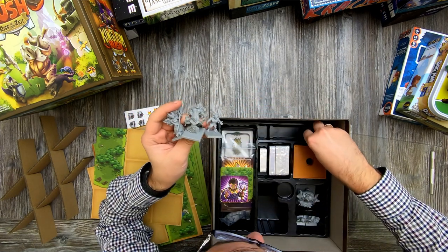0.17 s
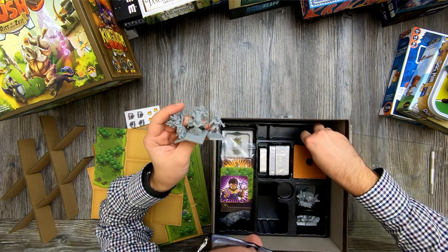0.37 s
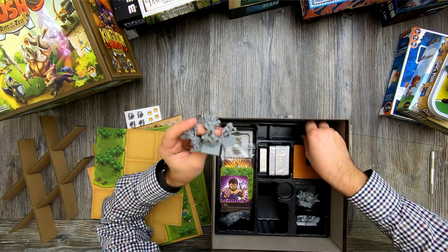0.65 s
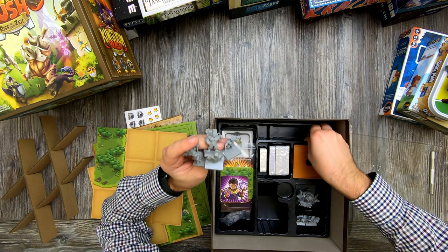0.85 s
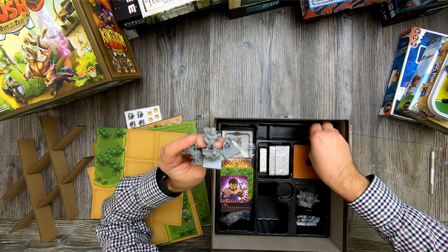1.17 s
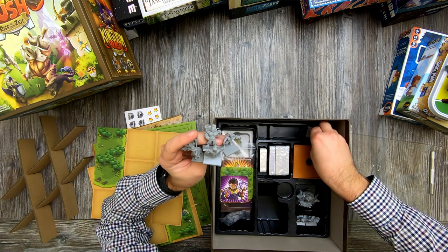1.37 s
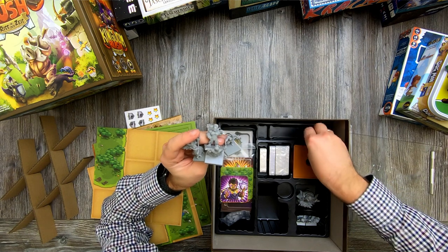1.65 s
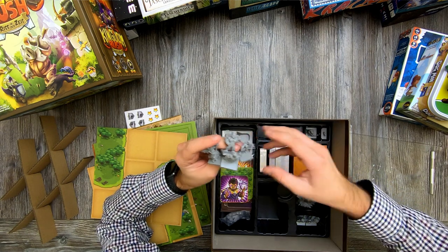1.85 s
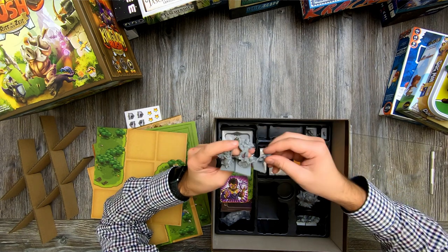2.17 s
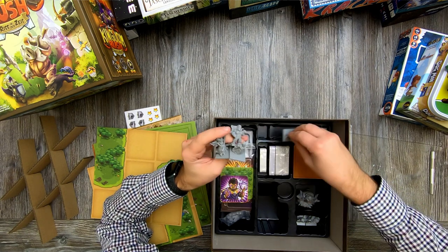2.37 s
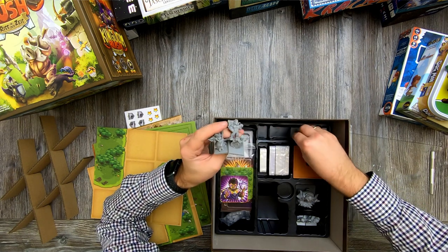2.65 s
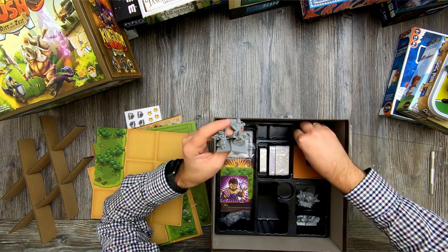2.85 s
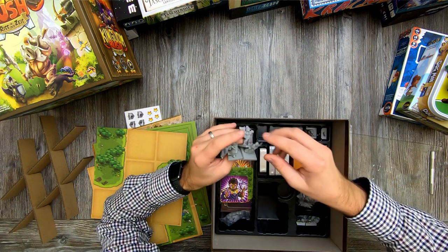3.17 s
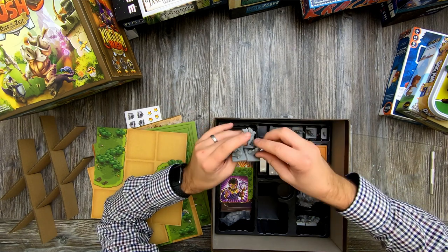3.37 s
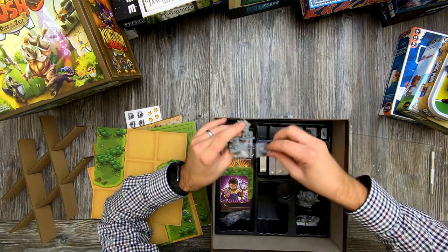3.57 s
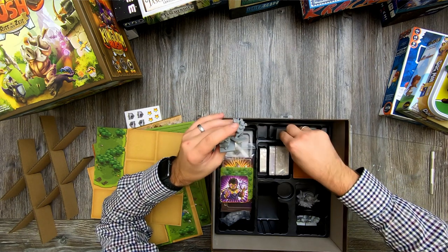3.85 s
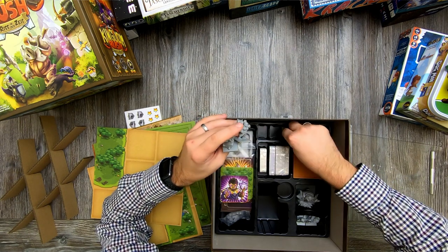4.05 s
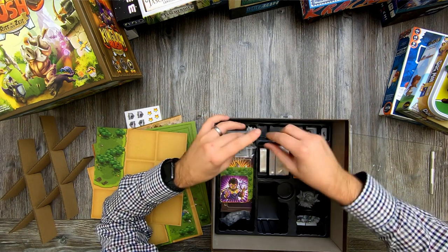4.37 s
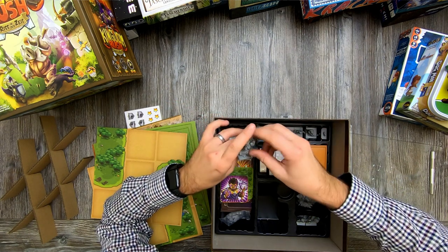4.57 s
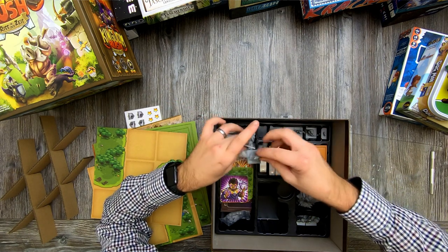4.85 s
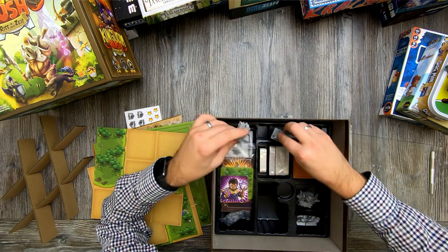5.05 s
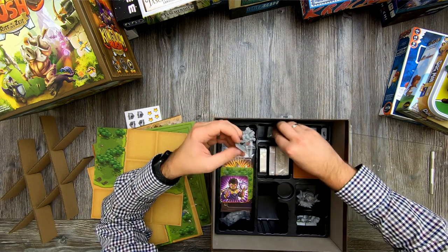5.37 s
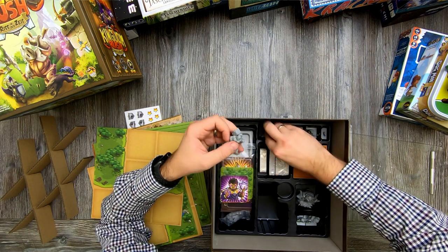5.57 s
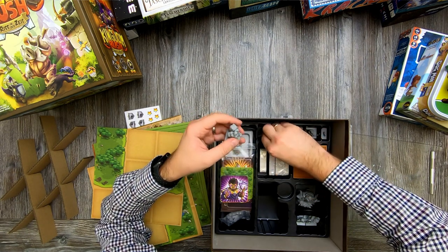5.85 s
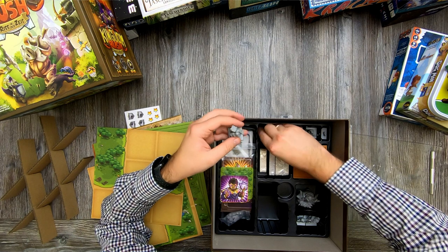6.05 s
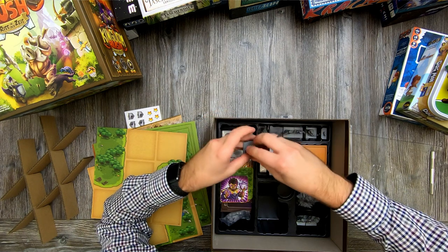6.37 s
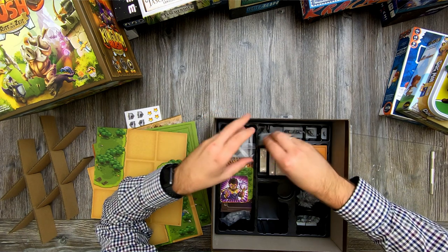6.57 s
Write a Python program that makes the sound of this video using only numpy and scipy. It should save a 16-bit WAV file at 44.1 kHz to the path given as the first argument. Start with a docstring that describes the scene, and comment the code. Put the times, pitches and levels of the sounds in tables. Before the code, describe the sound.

Dry, light plastic clatter in uneven bursts: hollow tray knocks with crisp clicking edges, brief scrapes and squeaks from fingers and figures, and a very faint high metallic jingle. Quiet gaps separate the clusters, and a last dense flurry brings delicate metal tinkling. Soft low room tone and short indoor echoes, heard from one microphone above the table.

```python
"""Small plastic figures are set down into the wells of a thin plastic tray inside a cardboard box, in a quiet room.
Each touch excites dying bands of noise and the modes of tray and figure; figures also click in the hand.
Metal rings tinkle as decaying modes and a thin jingle shakes faintly; rubbing is dense random slips, and random
pulses in narrow bands make short rubs, squeaks and thin metallic tones. Diffuse echoes follow the touches, clicks
and tinkles over room tone. One nearly mono microphone hangs above; only a faint hiss differs between its sides."""
import sys
import numpy as np
from scipy import signal
from scipy.fft import rfft, irfft
from scipy.io import wavfile

SR = 44100
rng = np.random.default_rng(int(sys.argv[2]) if len(sys.argv) > 2 else 0)


def wav_out(sig):
    """Save sig, one row per channel (or a flat mono array), as 16-bit PCM at SR to the path in sys.argv[1]."""
    wavfile.write(sys.argv[1], SR, np.round(np.clip(np.atleast_2d(sig).T, -1, 1) * 32767).astype(np.int16))


N = 295381


def from_db(db):
    """Logarithmic level: decibels to amplitude gain."""
    return 10 ** (np.asarray(db) / 20)


def rms_one(x):
    """Normalisation of mean power: scale to unit rms."""
    return x / np.sqrt(np.mean(x ** 2) + 1e-20)


def in_time(rows):
    """Linear interpolation: the columns of a curve table at every sample."""
    s, *columns = np.transpose(rows)
    return [np.interp(np.arange(N) / SR, s, column) for column in columns]


def shaped(x, spectrum):
    """Spectral filtering: colour a steady sound by (frequency_hz, gain_db) points over log frequency."""
    hz, db = np.transpose(spectrum)
    grid_hz = np.maximum(np.arange(N // 2 + 1) * SR / N, 1)
    gain_db = np.interp(np.log(grid_hz), np.log(hz), db)
    return irfft(rfft(x) * from_db(gain_db), N)


def band(x, low_hz, high_hz):
    """Band-pass filtering: only the components between two frequencies pass."""
    edges_hz = [low_hz, min(high_hz, .45 * SR)]
    return signal.sosfilt(signal.butter(3, edges_hz, "band", fs=SR, output="sos"), x)


def resonance(x, hz, width_hz):
    """Damped resonance: a pole pair with gain 1 on top, its radius set by the bandwidth."""
    r = np.exp(-np.pi * width_hz / SR)
    numerator = np.array([1, 0, -1]) * (1 - r * r) / 2
    return signal.lfilter(numerator, [1, -2 * r * np.cos(2 * np.pi * hz / SR), r * r], x)


def grains(per_s, spread_db):
    """Random impulse process: tiny contacts of uneven size and sign; rms 1."""
    sizes = from_db(spread_db * np.minimum(rng.exponential(1, N), 4))
    signed = sizes * rng.choice([-1, 1], N)
    return rms_one(signed * (rng.random(N) < per_s / SR))


def near_note(peak_db, note_hz, modes, db_per_octave):
    """Modal excitation: where a blow lands decides its note; modes farther from it are weaker."""
    octaves_off = np.abs(np.log2(np.array(modes)[:, 0] / note_hz[:, None]))
    return peak_db[:, None] - db_per_octave * octaves_off


def strike(times, peaks_db, modes, spread_db):
    """Impulse response of modes: clicks ring each one; peaks_db is blows x modes, varied by chance."""
    at = np.round(np.asarray(times) * SR).astype(int)
    out = np.zeros(N)
    strengths = from_db(peaks_db + spread_db * rng.standard_normal(peaks_db.shape))
    for k, (hz, gain_db, t60) in enumerate(modes):
        clicks = np.full(N, 1e-18)
        clicks[at] = strengths[:, k] * from_db(gain_db) * (-1) ** k   # neighbouring modes alternate in sign
        r = from_db(-60 / (t60 * SR))
        w = 2 * np.pi * hz / SR
        out += signal.lfilter([0, np.sin(w)], [1, -2 * r * np.cos(w), r * r], clicks)
    return out


# Figure touches tray: start_s, knock_db, hardness_db (extra treble), ring_down_s (t60 before each part's share),
# hollow_note_hz, wall_note_hz (favoured notes)
TOUCHES = [(0.001, -22, 0.5, 0.23, 483, 1140), (0.12, -29, 2, 0.29, 424, 1093),
           (0.231, -29, -0.5, 0.41, 355, 751), (.251, -24, 2, 0.24, 352, 1130),
           (.33, -28.5, -16, 0.14, 387, 813), (.389, -40, 15, 0.37, 396, 934),
           (.465, -20, -3, 0.38, 294, 885), (.492, -22, 0.5, .26, 393, 980),
           (0.513, -14.5, -8.5, 0.28, 560, 1060), (.527, -10, -9.5, 0.22, 365, 780),
           (0.636, -18, -1.5, 0.26, 340, 1200), (.736, -30, -6, 0.93, 400, 1450),
           (0.818, -35.5, 2.5, 0.58, 440, 1530), (1.011, -27, -9, 0.65, 402, 1130),
           (1.116, -19.5, 0.5, 0.43, 302, 1120), (1.15, -24, 6.5, .082, 570, 1220),
           (1.169, -22, 3.5, 0.074, 636, 1140), (1.249, -25, 5, 0.17, 320, 960),
           (1.329, -26.5, 0.5, 0.21, 407, 770), (1.376, -27.5, 3, 0.28, 370, 1650),
           (1.429, -32, 18, 0.4, 361, 1600), (1.462, -8.5, -8.5, 0.28, 350, 830),
           (1.502, -12.5, -2, 0.043, 402, 1140), (1.534, -19, -7.5, 0.14, 622, 760),
           (1.548, -20.5, -2.5, 0.25, 400, 1160), (2.5, -28.5, -6.5, 0.2, 524, 720),
           (2.56, -36.5, 6, 0.59, 367, 1090), (2.661, -20.5, -2, 0.16, 366, 910),
           (2.741, -21.5, 0.5, 0.098, 300, 1210), (2.766, -16.5, 8, 0.13, 352, 785),
           (2.785, -28, 15, 0.14, 490, 1210), (2.802, -23, -1, 0.15, 460, 1140),
           (2.882, -31.5, 4.5, 0.26, 292, 1130), (2.909, -32, 3, 0.13, 424, 1120),
           (3.802, -17, -5, 0.31, 418, 1560), (4.016, -40.5, 20, 0.22, 473, 1020),
           (4.047, -18.5, 1.5, 0.2, 334, 910), (4.063, -25.5, -11, .1, 330, 950),
           (4.134, -22.5, -5, 0.24, 690, 1300), (4.222, -14.5, -8, 0.22, 386, 990),
           (4.237, -26.5, -13, 0.29, 438, 896), (4.467, -31.5, -14, 0.33, 328, 762),
           (4.497, -48, 11, 0.4, 328, 1380), (5.145, -19.5, -12.5, .16, 320, 990),
           (5.21, -17.5, -7.5, 0.24, 301, 1000), (5.441, -39.5, 1.5, 0.53, 593, 1590),
           (5.539, -27.5, -32, 0.029, 402, 1360), (5.58, -20.5, -4, 0.36, 374, 786),
           (5.674, -28.5, 3.5, 0.25, 302, 780), (5.692, -25.5, 0.5, 0.28, 394, 751),
           (5.828, -20, -6, 0.17, 317, 2050), (5.833, -24.5, 13, 0.26, 463, 1940),
           (5.847, -19, 8, 0.12, 425, 1570), (5.885, -36, 15, .091, 425, 1490),
           (5.952, -20, 0, 0.15, 358, 980), (5.961, -17, -8, 0.23, 291, 990),
           (6.03, -25.5, 6, 0.19, 345, 2100), (6.054, -23.5, -13, 0.34, 396, 1110),
           (6.073, -25, -8, 0.22, 373, 1330)]
# Sounding parts (hollow, walls, figure, thin tips): low_hz, high_hz, burst_gain_db,
# ring_down_share [ratio], level_db (against the knock), hardness_share [ratio]
PARTS = [(212.6, 766, -12, 1.024, -0.5, 0), (643, 1980, -7, 1.23, -6, 0.62),
         (1960, 6200, -4.5, 0.98, -17.5, 0.84), (7150, 14000, -13, 1.5, -20.5, 0.86)]
# Modes of the undamped tray: pitch_hz, gain_db (relative), t60_s
TRAY_MODES = [(218, 4.5, 0.2), (278.2, 2.5, 0.15), (314.6, 3.5, 0.083), (368, 4, 0.054), (401.7, 2.5, 0.21),
              (455, 6, 0.055), (544, -0.5, 0.18), (554, 4, 0.18), (652.6, 0.5, 0.15), (733, -22, 0.035),
              (856, -1.5, 0.19), (1004, -9.5, 0.14), (997.5, 3, 0.14), (1085, -0.5, 0.3), (1130.4, 6, 0.12),
              (1309, 2, 0.3), (1461, 8.5, 0.082), (1629, 5, 0.04), (1825, -41, 0.063), (2170, 4, 0.046),
              (2422, 7, 0.084)]
# Modes of a figure: pitch_hz, gain_db (relative), t60_s
FIGURE_MODES = [(2750, 0, .014), (3150, 0, .014), (3650, 0, .013), (4150, 0, .012), (4750, 0, .011),
                (5300, 0, .011), (5950, -2, .012), (6700, -2, .01), (7500, -2, .01), (8500, -2, .008),
                (10200, -6, .004), (12500, -3, .004), (14500, -7, .005)]
CRACK_S, CRACK_DB = .005, -5   # time constant and onset against the burst
TRAY_MODES_DB, OFF_NOTE_DB_PER_OCTAVE = -6.5, 34
LONGEST_PLASTIC_T60_S = .13
FIGURE_NOTE_HZ, FIGURE_NOTE_OCTAVES = 2500, 0.49   # lowest favoured note and how far above it may stray
TIPS_NOTE_HZ, TIPS_NOTE_OCTAVES = 8500, .7   # the same for the figure's thin tips
FIGURE_IN_TRAY_DB, TIPS_IN_TRAY_DB = 7, 10
CHANCE_DB = 3.5   # spread of each mode's strength, by place of contact


def touch_bursts(parts_db):
    """High modal density: uncountable modes act as band noise, a crack and then exponential decay."""
    starts, ring_downs = np.transpose(TOUCHES)[[0, 3]]
    t = np.arange(SR // 2) / SR
    out = np.zeros(N)
    rattle = 0.4 * grains(500, 6.6)   # the figure rocks and rattles as it settles
    for (low, high, gain_db, share, *_), part_db in zip(PARTS, parts_db):
        power = np.zeros(N + len(t))
        for start, db, t60 in zip(starts, part_db, ring_downs):
            at = round(start * SR)
            dying = from_db(-60 * t / max(t60 * share, .01)) + from_db(CRACK_DB) * np.exp(-t / CRACK_S)
            power[at:at + len(t)] += (from_db(db + gain_db) * dying) ** 2   # powers add
        burst = np.sqrt(power[:N]) * (rng.standard_normal(N) + rattle)
        lift = np.sqrt(SR / 2 / (high - low))   # the band keeps the burst's rms
        out += lift * band(burst, low, high)
    return out


def touches():
    """Modal superposition: a touch sums dying noise bursts with the strongest modes of figure and tray."""
    s, knock_db, hard_db, _, hollow_hz, wall_hz = np.transpose(TOUCHES)
    parts_db = [knock_db + level_db + share * hard_db for *_, level_db, share in PARTS]
    out = touch_bursts(parts_db)

    stray = rng.random((len(s), 2))
    figure_hz = FIGURE_NOTE_HZ * 2 ** (FIGURE_NOTE_OCTAVES * stray[:, 0])
    tips_hz = TIPS_NOTE_HZ * 2 ** (TIPS_NOTE_OCTAVES * stray[:, 1])
    hollow = near_note(parts_db[0], hollow_hz, TRAY_MODES, OFF_NOTE_DB_PER_OCTAVE)
    walls = near_note(parts_db[1], wall_hz, TRAY_MODES, OFF_NOTE_DB_PER_OCTAVE)
    figure = near_note(parts_db[2], figure_hz, FIGURE_MODES, OFF_NOTE_DB_PER_OCTAVE)
    tips = near_note(parts_db[3], tips_hz, FIGURE_MODES, OFF_NOTE_DB_PER_OCTAVE)

    figure_db = np.maximum(FIGURE_IN_TRAY_DB + figure, TIPS_IN_TRAY_DB + tips)
    out += strike(s, figure_db, FIGURE_MODES, CHANCE_DB)
    # the box damps the plastic
    damped = [(hz, db, min(t60, LONGEST_PLASTIC_T60_S)) for hz, db, t60 in TRAY_MODES]
    return out + strike(s, TRAY_MODES_DB + np.maximum(hollow, walls), damped, CHANCE_DB)


# Figures click on each other in the hand: start_s, level_db (snap peak), pitch_hz (favoured note)
TICKS = [(3.309, -34, 5500), (3.346, -46, 7000), (3.401, -18, 5500), (3.410, -29, 4600), (3.491, -42, 4200),
         (3.496, -42, 4200), (4.739, -20.5, 3500), (4.806, -29, 9500)]


def ticks():
    """Impact of small hard bodies: a short broad snap and a few quickly damped modes."""
    s, peak_db, note_hz = np.transpose(TICKS)
    out, t = np.zeros(N), np.arange(2000) / SR
    decay = np.exp(-t / .0012) + from_db(-20) * np.exp(-t / .018)
    snaps = rng.standard_normal((len(s), len(t))) * decay
    for start, db, hz, snap in zip(s, peak_db, note_hz, snaps):
        snap = resonance(snap, hz, .6 * hz)
        out[round(start * SR):][:len(t)] += from_db(db) * snap / np.abs(snap).max()
    modes_db = near_note(peak_db - 10, note_hz, FIGURE_MODES, db_per_octave=15.0)
    return out + strike(s, modes_db, FIGURE_MODES, CHANCE_DB)


# Fingers and figures rubbing, points of one continuous curve: time_s, level_db (dull rub on the tray),
# brightness_db
RUB = [(0.0, -47, 1), (.18, -50.5, -7), (.33, -41, -5), (.5, -52.5, 4), (1.1, -54, 7), (1.3, -46, -4),
       (1.45, -35, -2), (1.49, -22.5, -0.5), (1.6, -34.5, -6), (1.72, -62, 2), (2.27, -57.5, 4),
       (2.6, -62.5, 3), (2.8, -29.5, -0.5), (2.97, -53, 5), (3.1, -58, 1.5), (3.38, -57.5, 5),
       (3.42, -59, 12), (3.78, -57.5, 0.5), (3.97, -48, 9), (4.18, -39, -2), (4.42, -54, 5.5),
       (4.53, -69.5, 22), (4.66, -37, 8), (4.85, -57, 12.5), (4.97, -59.5, 2), (5.35, -52, 2.5),
       (5.62, -49.5, 8), (5.78, -52.5, 10), (6.0, -37.5, 6), (6.12, -41, 4), (6.19, -61, 3.5),
       (6.7, -56.5, -3)]
# Colour of the rustle on the figures: frequency_hz, density_db (per Hz, relative)
RUSTLE = [(2060, 0), (3500, -3.5), (6960, -5), (9260, -8), (11100, -16.5), (13200, -10), (16000, -46)]
# levels of the quiet noise floor, from which the rubbing rises
FLOOR_DULL_DB, FLOOR_SCRAPE_DB, FLOOR_RUSTLE_DB = -55.5, -62.5, -61
# share of the dull rub's swing, share of the brightness
SCRAPE_FOLLOWS, RUSTLE_FOLLOWS = (.9, 0.68), (0.42, 0.92)
FLUTTER_DB = .8   # rms unevenness of the slips


def rubbing():
    """Friction as dense slips: they shake the tray dully, scrape its walls and rustle on the figures."""
    dull_db, brightness_db = in_time(RUB)
    swing_db = dull_db - FLOOR_DULL_DB
    scrape_db = FLOOR_SCRAPE_DB + SCRAPE_FOLLOWS[0] * swing_db + SCRAPE_FOLLOWS[1] * brightness_db
    rustle_db = FLOOR_RUSTLE_DB + RUSTLE_FOLLOWS[0] * swing_db + RUSTLE_FOLLOWS[1] * brightness_db
    flutter_db = FLUTTER_DB * rms_one(band(rng.standard_normal((2, N)), 10, 45))
    scrape_db = scrape_db + flutter_db[0]
    rustle_db = rustle_db + flutter_db[1]
    dull = rms_one(band(grains(2500, 3.0), 250, 1000))
    scrape = rms_one(band(grains(3000, 3.0), 850, 3600))
    rustle = rms_one(shaped(grains(9000, 2.0), RUSTLE))
    return from_db(dull_db) * dull + from_db(scrape_db) * scrape + from_db(rustle_db) * rustle


# Short rubs, squeaks and thin metallic tones: start_s, length_s, pitch_hz, width_hz,
# level_db (rms before the fades)
NARROW_SOUNDS = [(0.816, 0.089, 1390, 350, -42.5), (0.995, .06, 1454, 150, -45),
                 (2.573, 0.073, 2140, 80, -50.5), (3.05, 0.17, 9250, 500, -62.5),
                 (3.44, 0.14, 9170, 200, -61), (3.503, 0.15, 3100, 700, -57),
                 (3.972, 0.069, 9250, 300, -53), (4.432, 0.05, 3100, 400, -54),
                 (4.533, 0.11, 490, 201, -39), (4.62, 0.11, 1530, 2480, -36.5),
                 (5.307, 0.077, 10950, 80.5, -65), (5.441, 0.021, 1600, 150, -50),
                 (5.446, 0.15, 6800, 200, -57.5), (5.587, 0.076, 10800, 80, -60),
                 (5.801, 0.043, 4160, 100, -44), (5.88, 0.1, 6820, 100, -51.5)]


def narrow_sounds():
    """Resonance under random excitation: dense pulses excite one narrow band for each short sound."""
    out, pulses = np.zeros(N + SR), grains(2500.0, 1.27)
    for s, length, hz, width_hz, db in NARROW_SOUNDS:
        at, n = round(s * SR), round(length * SR)
        once = resonance(pulses[at:at + n], hz, width_hz)
        tone = rms_one(resonance(once, hz, width_hz))
        out[at:at + n] += from_db(db) * tone * signal.windows.tukey(n, .6)
    return out[:N]


# Finger rings touch: start_s, level_db (before mode gain and chance)
TINKLES = [(5.79, -36), (5.84, -42), (5.93, -44), (5.965, -42), (5.99, -41), (6.02, -47), (6.045, -45),
           (6.09, -50), (6.13, -53)]
# Mode pitches of the rings: pitch_hz
RINGS_HZ = [6650, 8050, 8240, 10755, 11750, 11785, 13490, 13935, 15052]
# Their strength and decay, in the same order: gain_db (relative), t60_s
RINGS = [(-6, .4), (-9, .3), (-6, .25), (-4, .28), (-12, .3), (-3, .36), (-5, .28), (-6, .24), (-7, .22)]
GLANCING = 3   # number of first touches that only glance
GRIP_DB = 2   # rms waver as the moving finger damps the ring


def tinkles():
    """Lightly damped metal modes: glancing touches wake mainly the strongest; the finger makes it waver."""
    s, peak_db = np.transpose(TINKLES)
    peaks_db = peak_db[:, None] + np.zeros(len(RINGS))
    strongest = np.argmax(np.array(RINGS)[:, 0])
    peaks_db[:GLANCING] -= 30 * (np.arange(len(RINGS)) != strongest)
    grip = rms_one(band(rng.standard_normal(N), 15, 60))
    ringing = strike(s, peaks_db, np.column_stack([RINGS_HZ, RINGS]), spread_db=3.0)
    return from_db(GRIP_DB * grip) * ringing


# Clearest shakes of a thin metallic jingle, perhaps watch strap links: start_s, level_db
JINGLES = [(.74, -53), (.92, -53), (1.45, -57), (1.51, -60), (2.552, -55), (2.7, -54), (2.935, -57),
           (3.06, -49), (3.18, -58), (3.43, -53), (3.52, -62), (4.2, -56), (4.48, -51), (4.72, -58),
           (4.77, -53), (5.44, -54)]
JINGLE_HZ, JINGLE_WIDTH_HZ, JINGLE_T60_S = 12870, 100, .55
FAINT_JINGLES, FAINT_JINGLE_DB, STRAP_MOVES_S = 16, -68, (.3, 4.9)   # faint shakes fall at random


def strap():
    """Energy decay: after each shake small links knock at random into one thin resonance, dying away."""
    faint = [(s, FAINT_JINGLE_DB) for s in rng.uniform(*STRAP_MOVES_S, FAINT_JINGLES)]
    shakes = np.full(N, 1e-18)
    for s, db in JINGLES + faint:
        shakes[round(s * SR)] += from_db(2 * db)   # power
    power = signal.lfilter([1], [1, -from_db(-120 / (JINGLE_T60_S * SR))], shakes)
    once = resonance(grains(700, 2.7), JINGLE_HZ, JINGLE_WIDTH_HZ)
    links = resonance(once, JINGLE_HZ, JINGLE_WIDTH_HZ)
    return np.sqrt(power) * rms_one(links)


ROOM_T60_S, ROOM_DB, ROOM_DULL_HZ, ROOM_GAP_S = 0.24, -9, 4970, 0.0065


def room(x):
    """Diffuse reverberation: noise echoes decay exponentially after a gap, the treble dying faster."""
    t = np.arange(int(.6 * SR)) / SR
    noise = rng.standard_normal(len(t)) * (t > ROOM_GAP_S)
    dull = signal.sosfilt(signal.butter(1, ROOM_DULL_HZ, fs=SR, output="sos"), noise)
    tail = dull * from_db(-60 * t / ROOM_T60_S) + (noise - dull) * from_db(-95 * t / ROOM_T60_S)
    return signal.fftconvolve(x, tail / np.sqrt(np.sum(tail ** 2)))[:N]


# Colour of the room tone: frequency_hz, density_db (per Hz, relative)
AIR = [(12, -14), (22, 3.5), (52, -2), (116, -5), (200, -9), (320, -12.5), (540, -19.5), (900, -42),
       (1600, -27.5), (3000, -69), (6000, -53), (10000, -43.5), (16000, -40)]
AIR_DB = -44   # rms


def room_tone():
    """Stationary random noise: white noise coloured by a fixed spectrum."""
    return from_db(AIR_DB) * rms_one(shaped(rng.standard_normal(N), AIR))


def scene():
    """Linear superposition: touches, clicks and tinkles with echoes, plus dry rubs, jingle and room tone."""
    table = touches() + ticks() + tinkles()
    echoes = from_db(ROOM_DB) * room(table)
    mid = table + echoes + rubbing() + narrow_sounds() + strap() + room_tone()
    return np.array([mid, mid])   # alike on both sides


# Colour of the hiss: frequency_hz, density_db (per Hz, relative)
HISS = [(30, -4), (300, -10), (1500, -17), (4000, -15), (9000, -13), (16000, -16)]
HISS_DB = -69   # rms before the top is cut
TREBLE_STEP_HZ, TREBLE_STEP_DB, CUTOFF_HZ = 9000, -5, 15800


def record(dry):
    """Limited bandwidth: weaker above a treble step, top cut off; a faint hiss is opposite on the two sides."""
    below = signal.sosfilt(signal.butter(4, TREBLE_STEP_HZ, fs=SR, output="sos"), dry)
    above = signal.sosfilt(signal.butter(4, TREBLE_STEP_HZ, "high", fs=SR, output="sos"), dry)
    hiss = from_db(HISS_DB) * rms_one(shaped(rng.standard_normal(N), HISS))
    heard = below + from_db(TREBLE_STEP_DB) * above + hiss * [[1], [-1]]
    return signal.sosfilt(signal.ellip(12, .5, 70, CUTOFF_HZ, fs=SR, output="sos"), heard)


dry = scene()
out = record(dry)
wav_out(out)
```